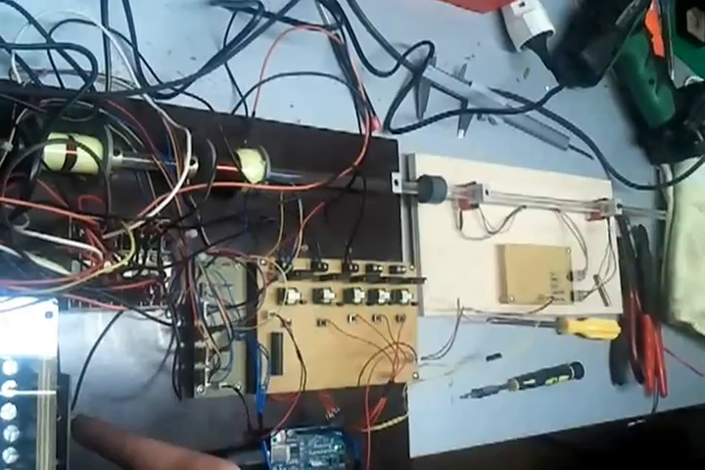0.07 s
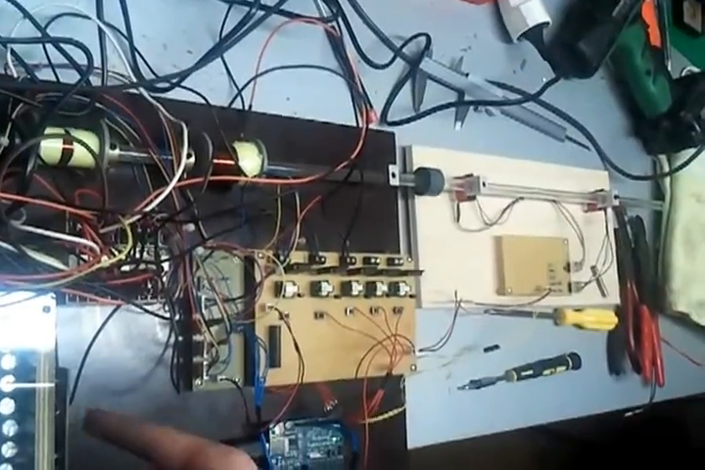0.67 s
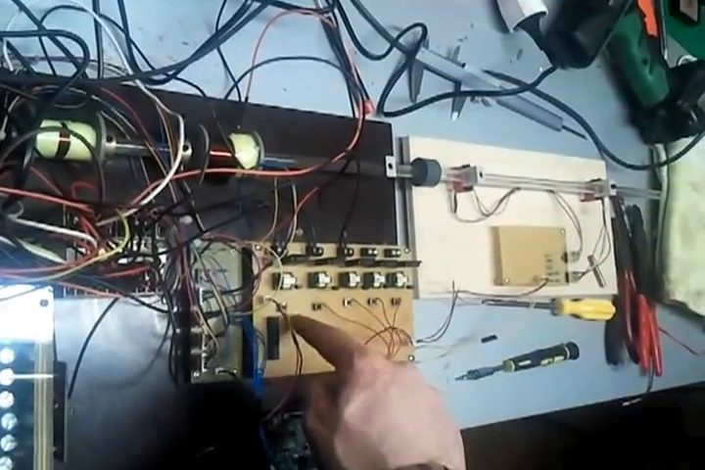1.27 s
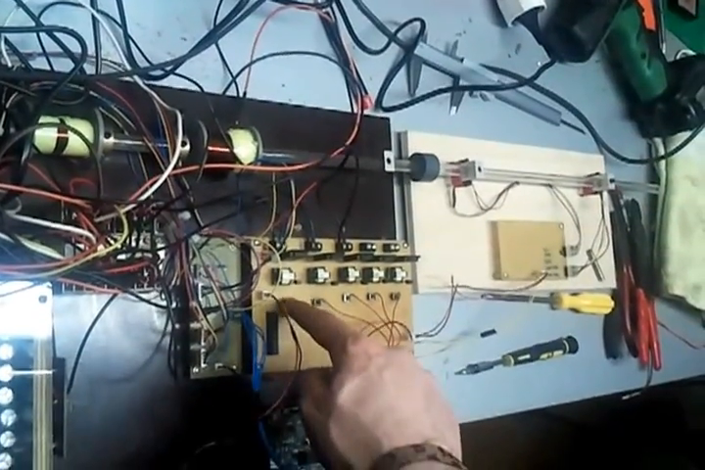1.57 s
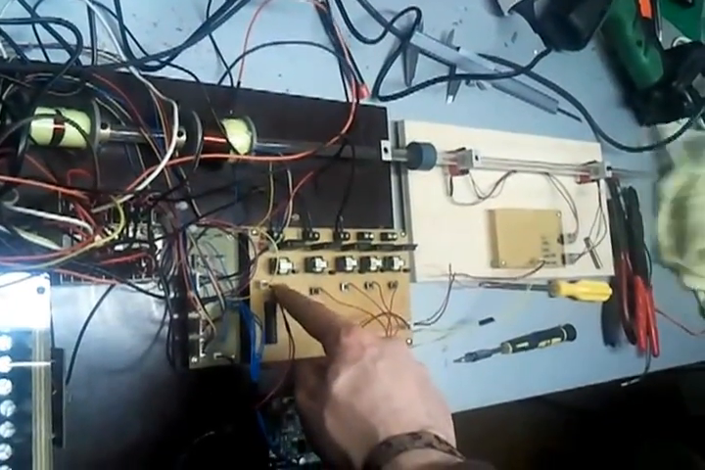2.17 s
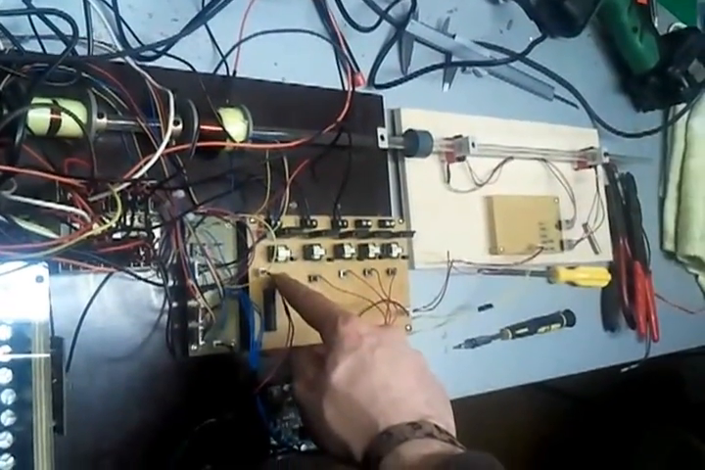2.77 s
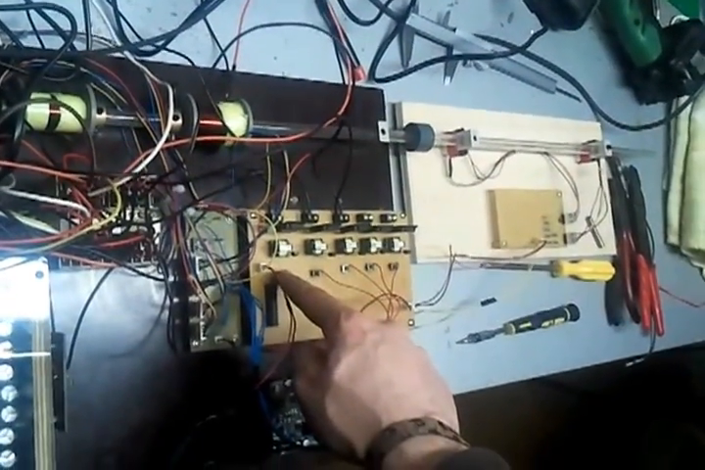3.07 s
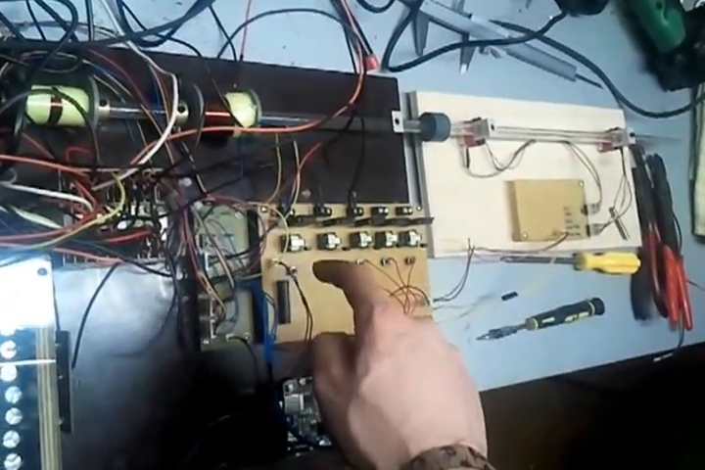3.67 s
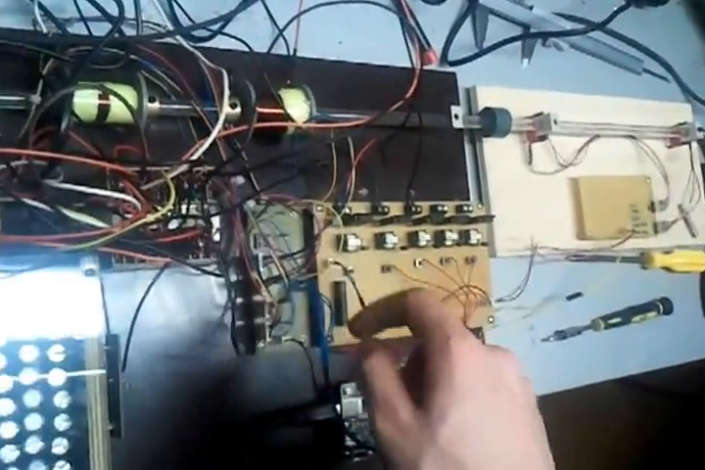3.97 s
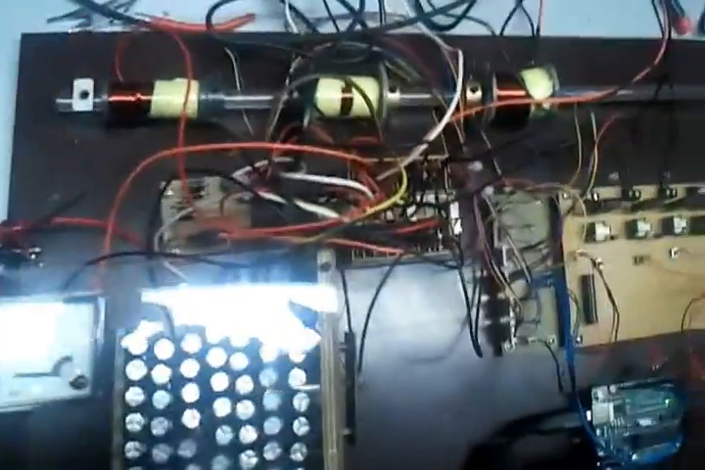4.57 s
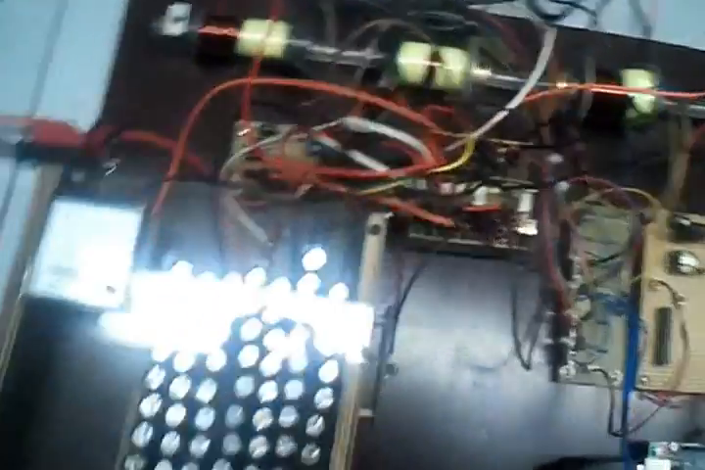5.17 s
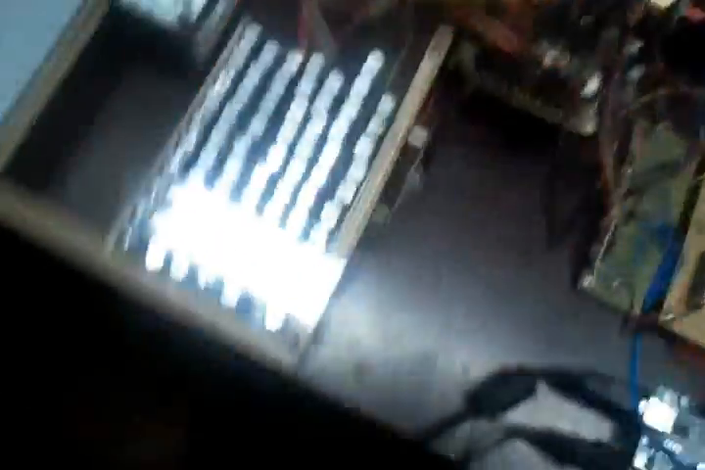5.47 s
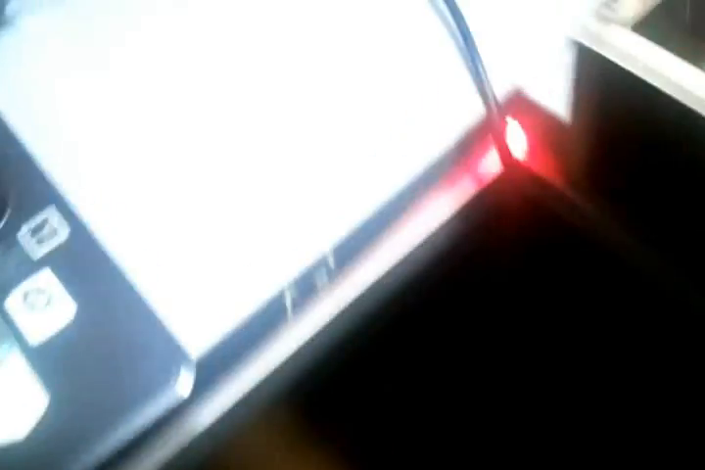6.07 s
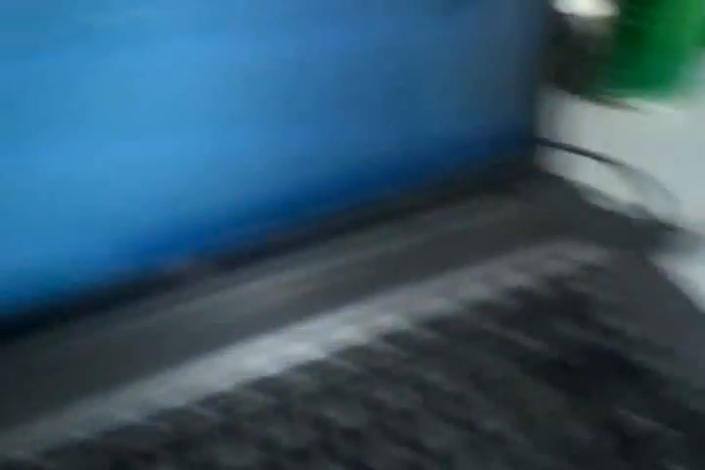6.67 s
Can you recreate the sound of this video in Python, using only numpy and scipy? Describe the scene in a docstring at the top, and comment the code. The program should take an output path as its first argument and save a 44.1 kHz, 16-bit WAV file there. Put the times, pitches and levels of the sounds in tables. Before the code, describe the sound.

After a small click, an electromagnetic gun bangs, and the metal projectile hits a wooden panel, bounces and settles, followed by soft handling rustles.

```python
"""A homemade coilgun fires on a workbench in a small, hard room, heard over a steady microphone hiss.
First a plastic switch clicks. Then the coils kick the bench and the steel slug leaves with a crack.
It booms against a wooden panel, glances off furniture, rings on the floor and bounces to rest.
Last, the small mono camera is picked up, with soft bumps, knocks, ticks and a rustle of hand and sleeve.
Each hard blow is a burst of noise plus a few ringing tones; each rustle is a soft, fluttering hiss."""
import sys
import numpy as np
from scipy import signal
from scipy.fft import rfft, irfft, next_fast_len
from scipy.io import wavfile

SR = 44100
rng = np.random.default_rng(int(sys.argv[2]) if len(sys.argv) > 2 else 0)


def digitize_waveform(pressure):
    """Quantize a signal to 16-bit integers and store it at the path in sys.argv[1].

    Rows of a 2-D input are taken as channels; values are limited to [-1, 1].
    """
    field = np.atleast_2d(pressure).T
    bounded = np.clip(field, -1, 1)
    quanta = np.round(bounded * 32767).astype(np.int16)
    wavfile.write(sys.argv[1], SR, quanta)


N = 300762
TIME_S = np.arange(N) / SR
AGE_S = np.arange(SR) / SR  # time since a blow


def undb(db):
    """Turn decibels into a number to multiply by."""
    return 10 ** (np.asarray(db) / 20)


def value_at(points, hz):
    """Read between (pitch_hz, value) points, spacing octaves evenly."""
    pitches, values = np.transpose(points)
    return np.interp(np.log(np.maximum(hz, 1)), np.log(pitches), values)


def unit(x):
    """Scale a sound to an average strength (rms) of 1."""
    return x / np.sqrt(np.mean(x ** 2))


def unit_attack(x):
    """Scale a blow to a strength of 1 over its first 30 ms."""
    return x / np.sqrt(np.mean(x[AGE_S < .03] ** 2))


def tint(x, colour):
    """Give a sound a colour: turn each pitch up or down by a list of (pitch_hz, gain_db)."""
    size = next_fast_len(len(x) // 2 + 1) * 2
    gain = undb(value_at(colour, np.fft.rfftfreq(size, 1 / SR)))
    cepstrum = np.fft.irfft(np.log(gain))
    # fold the filter so that it rings only after a blow, never before
    cepstrum[1:size // 2] *= 2
    cepstrum[size // 2 + 1:] = 0
    return irfft(rfft(x, size) * np.exp(rfft(cepstrum)), size)[:len(x)]


def wander(rate_hz):
    """A random line that drifts around zero, mostly between -1 and 1."""
    points = rng.standard_normal(int(N / SR * rate_hz) + 2)
    return np.interp(TIME_S * rate_hz, np.arange(len(points)), points)


def add(track, start_s, sound):
    """Mix a sound into the track."""
    start = int(start_s * SR)
    track[start:start + len(sound)] += sound[:N - start]


# how long the room echoes: pitch_hz, fade_s (a fade is the time to drop by 60 dB)
ROOM_FADES = [(60, 0.93), (250, 0.4), (900, 0.41), (2000, 0.42), (4000, 0.41), (7500, 0.38)]
def burst(colour, fade_s, room_db, linger=1):
    """A struck thing gives a puff of noise; the room carries it on. Linger scales the echo's length."""
    hz = np.fft.rfftfreq(len(AGE_S), 1 / SR)
    edges_hz = [0, 180, 360, 600, 1000, 1600, 2500, 4000, 6000, 10000]
    spectrum = rfft(rng.standard_normal(len(AGE_S)))
    direct = undb(-60 * AGE_S / fade_s)
    out = 0
    for low, high in zip(edges_hz, edges_hz[1:]):
        echo_s = linger * value_at(ROOM_FADES, (low + high) / 2)
        echo = undb(room_db - 60 * AGE_S / echo_s)
        band = irfft(spectrum * ((hz >= low) & (hz < high)), len(AGE_S))
        out += unit_attack(band * np.hypot(direct, echo)) * np.sqrt(high - low)
    return unit_attack(tint(out, colour))


def ring(tones, sustain):
    """An object's own tones, in a new mix at each blow. Sustain scales their fade times."""
    out = 0
    for hz, level_db, fade_s in tones:
        chance_db, direction = rng.standard_normal(2)
        swell = 1 - np.exp(-AGE_S * hz / 3)  # builds over about three cycles
        fade = undb(-60 * AGE_S / (sustain * fade_s))
        wave = np.sign(direction) * np.sin(2 * np.pi * hz * AGE_S)
        out += undb(level_db + chance_db) * swell * fade * wave
    return unit_attack(out)


def blows(hits, colour, tones, fade_s, room_db, linger, ring_db, ripple_db, sustain=1):
    """Hard blows on one object: each is a burst of noise plus ringing tones."""
    # every object has its own fine pattern of stronger and weaker pitches
    hz = np.arange(500, 9000, 55)
    ripple = np.column_stack([hz, ripple_db * rng.standard_normal(len(hz)) * (hz > hz[0])])
    out = np.zeros(N)
    for start_s, level_db in hits:
        noise = unit_attack(tint(burst(colour, fade_s, room_db, linger), ripple))
        ringing = undb(ring_db) * ring(tones, sustain)
        add(out, start_s, undb(level_db) * unit_attack(noise + ringing))
    return out


def tap(pitch_hz, width_octaves, fade_s, room_db):
    """A light touch makes a burst of noise around one pitch."""
    hz = np.geomspace(20, 10000, 60)
    hump_db = -48 * np.log10(1 + (np.log2(hz / pitch_hz) / (2 * width_octaves)) ** 2)
    treble_loss_db = 44 * np.maximum(np.log2(hz / 6240), 0)  # the microphone dulls the highs
    return burst(np.column_stack([hz, hump_db - treble_loss_db]), fade_s, room_db)


def rustle(speed, colour, jitter_db, flutter_db):
    """A soft, fluttering hiss of rubbing, louder when the rubbing is faster."""
    noise = rng.standard_normal(N) * undb(jitter_db * rng.exponential(size=N))
    return unit(tint(noise, colour)) * speed * undb(flutter_db * wander(60))


# colour of the hiss: pitch_hz, gain_db
HISS_COLOUR = [(25, -23), (54, -15), (170, -2.5), (243, 0), (400, -2), (826, -4), (1400, -8), (2500, -10.5),
               (4200, -11), (6100, -12.5), (7000, -19.5), (7600, -29.5), (9000, -45)]
# faint whines in the hiss: pitch_hz, width_hz, level_db
HISS_WHINES = [(1880, 55, -70.5), (4980, 23, -70), (5310, 60, -75), (6094, 50, -75), (6174, 57, -79.5)]
def background():
    """Even microphone hiss over a faint rush of the room, with a thin whine in it."""
    out = unit(tint(rng.standard_normal(N), HISS_COLOUR)) * undb(-54.5 + 0.35 * wander(5))
    for hz, width_hz, level_db in HISS_WHINES:
        narrow_band = signal.iirpeak(hz, hz / width_hz, fs=SR)
        out += undb(level_db) * unit(signal.lfilter(*narrow_band, rng.standard_normal(N)))
    return out


# soft bumps on the camera: start_s, level_db
FINGER_BUMPS = [(4.835, -51.5), (5.005, -55), (5.046, -57)]
def bumps():
    """Fingers thud on the camera, always at the same low pitch."""
    out = np.zeros(N)
    for start_s, level_db in FINGER_BUMPS:
        thud = tap(pitch_hz=85, width_octaves=0.72, fade_s=0.081, room_db=-25)
        add(out, start_s, undb(level_db) * thud)
    return out


# slides of the hand: start_s, length_s, level_db
HAND_SLIDES = [(5.197, .1, -58), (5.46, 0.43, -51.5), (5.898, 0.27, -54.5), (6.516, 0.062, -49),
               (6.663, 0.091, -53)]
# colour of the rubbing: pitch_hz, gain_db
HAND_COLOUR = [(60, -23.5), (250, -4), (900, -3), (1400, 3.5), (2050, 2.5), (2900, 0.5), (3500, -5),
               (4300, -6), (4780, 1.5), (5700, -5), (6400, -8), (7200, -14.5), (8000, -32)]
def hand(rise_share=0.7, release_s=0.16):
    """A hand slides along the camera and its cable: it gathers speed, holds it and lets go."""
    speed = 0
    for start_s, length_s, level_db in HAND_SLIDES:
        rise = np.clip((TIME_S - start_s) / (rise_share * length_s), 0, 1)
        release = np.exp(-np.maximum(TIME_S - start_s - length_s, 0) / release_s)
        speed += undb(level_db) * rise * release
    return rustle(speed, HAND_COLOUR, jitter_db=0, flutter_db=1.5)


# a sleeve swishing past: peak_s, level_db
SLEEVE_SWISHES = [(6.438, -38), (6.82, -48.5)]
# colour of the cloth: pitch_hz, gain_db
SLEEVE_COLOUR = [(60, -9.5), (280, 2), (700, -3.5), (1700, 0.5), (2600, -4.5), (4300, -7), (5600, 0.5),
                 (6400, -0.5), (7200, -12), (8000, -18.5)]
def sleeve(rise_db_per_s=46.5, fall_db_per_s=202):
    """A swish swells slowly as the cloth comes near, then stops quickly."""
    speed = 0
    for peak_s, level_db in SLEEVE_SWISHES:
        drop_db = np.maximum(rise_db_per_s * (peak_s - TIME_S), fall_db_per_s * (TIME_S - peak_s))
        speed += undb(level_db - drop_db)
    return rustle(speed, SLEEVE_COLOUR, jitter_db=0.7, flutter_db=1.2)


# small sharp ticks: start_s, level_db, pitch_hz, fade_s
SMALL_TICKS = [(.849, -57.5, 5760, 0.092), (1.695, -58, 1400, .04), (2.323, -40, 2500, 0.026),
               (2.576, -39.5, 2450, 0.045), (5.175, -58, 4160, .03), (5.457, -49, 1950, .08),
               (6.377, -41, 1790, 0.085), (6.4221, -39.5, 4750, 0.0022), (6.459, -49, 1320, 0.22)]
def ticks(usual_fade_s=0.08):
    """Metal and plastic tick. The longer a tick rings, the purer it is and the more it echoes."""
    out = np.zeros(N)
    for start_s, level_db, hz, fade_s in SMALL_TICKS:
        stretch = fade_s / usual_fade_s
        width_octaves = 0.36 / stretch ** 0.51
        room_db = -11 + 10 * np.log10(stretch)
        add(out, start_s, undb(level_db) * tap(hz, width_octaves, fade_s, room_db))
    return out


# the slug settling and things nudged on the bench: start_s, level_db, pitch_hz, room_db
WOOD_KNOCKS = [(2.577, -43.5, 480, -20), (3.5617, -39.5, 295, -7.5), (3.6812, -47.5, 290, -5),
               (5.542, -39, 307, -10), (5.668, -43, 306, -10.5), (6.344, -41.5, 264, -8),
               (6.372, -39.5, 250, -16), (6.702, -49.5, 400, -18)]
def knocks(body_delay_s=0.005):
    """Each knock is a bright touch, then the deeper body of the wood answers."""
    out = np.zeros(N)
    for start_s, level_db, hz, room_db in WOOD_KNOCKS:
        touch = tap(hz * 1.88, width_octaves=0.91, fade_s=0.073, room_db=room_db)
        body = tap(hz, width_octaves=0.53, fade_s=0.09, room_db=room_db)
        add(out, start_s, undb(level_db - 3) * touch)
        add(out, start_s + body_delay_s, undb(level_db) * body)
    return out


# the switch pressed and snapping home: start_s, level_db
CLICKS = [(.7735, -37), (.7795, -44.5)]
# colour of a click: pitch_hz, gain_db
CLICK_COLOUR = [(60, -38), (250, -19), (550, -3.5), (1000, 1.5), (1400, -6), (2000, -15.5), (3300, -20),
                (4900, -15), (6500, -26), (8000, -44)]
# tones of the switch's case: pitch_hz, level_db, fade_s
CASE_TONES = [(811, -8, .15), (940, 10, 0.15), (1023, -2, .2), (1187, -7, .25), (1360, -5, 0.41)]
def switch():
    """A plastic switch clicks twice, very fast, and its case rings."""
    return blows(CLICKS, CLICK_COLOUR, CASE_TONES,
                 fade_s=0.01, room_db=-21.5, linger=0.71, ring_db=-11, ripple_db=0.5)


# the slug bouncing on the floor: start_s, level_db
BOUNCES = [(3.1935, -18), (3.221, -17.5)]
# colour of a bounce: pitch_hz, gain_db
BOUNCE_COLOUR = [(60, -53), (150, -35), (245, -9), (390, -16.5), (485, -13.5), (620, -18), (850, -8.5),
                 (1100, -10), (1450, -3), (2300, -5.5), (2800, -6.5), (3850, -0.5), (4700, -4.5),
                 (6200, -4), (7600, -19), (9000, -25)]
# tones of the steel slug: pitch_hz, level_db, fade_s
SLUG_TONES = [(482, -12.5, 1), (827, -10, 1), (938, -10, 1), (1458, -3.5, .5), (1797, -4.5, 0.88),
              (2150, -12.5, .45), (2360, -0.5, 1), (2420, 0.5, 0.78), (3007, 0, 0.25), (3800, -8, 0.24),
              (3794, -12, 0.42), (3670, 1.5, 0.42), (4720, -0.5, .35), (5160, -8, 0.31), (5460, 2, 0.24),
              (5800, 7, 0.12), (6070, -15, .3), (6439, 10, 0.14)]
def slug_bounces():
    """The steel slug clinks off the hard floor and fills the room with echo."""
    return blows(BOUNCES, BOUNCE_COLOUR, SLUG_TONES,
                 fade_s=0.08, room_db=9.5, linger=0.83, ring_db=-5, ripple_db=1.5, sustain=0.85)


# the slug landing flat: start_s, level_db
LANDINGS = [(3.3845, -14), (3.415, -23.5)]
# colour of a landing: pitch_hz, gain_db
LANDING_COLOUR = [(59, -58), (100, -41), (235, -7.5), (356, -16.5), (460, -0.5), (532, 0), (593, -1),
                  (968, -1.5), (1250, 1.5), (1610, -5.5), (2150, 1), (3390, -4), (4870, -8), (7000, -26.5),
                  (7670, -45.5), (9970, -77), (16900, -120)]
# tones of the slug against the floor: pitch_hz, level_db, fade_s
FLOOR_TONES = [(470.6, 10.5, 0.19), (735, 1, 0.2), (1060, -14, 0.26), (1273, 2, 0.17), (2190, -5, 0.41),
               (2182, -6, 0.49), (2490, 1, 0.3), (3000, -18, .3), (3340, 9.5, .2), (3200, 6.5, 0.27),
               (4467, 0, 0.26), (4940, -4, .25)]
def slug_lands():
    """The slug clacks down flat; staying against the floor cuts its ringing short."""
    return blows(LANDINGS, LANDING_COLOUR, FLOOR_TONES,
                 fade_s=0.14, room_db=-3, linger=0.92, ring_db=-6.5, ripple_db=0.5, sustain=0.69)


# the slug hitting the panel, then the furniture: start_s, level_db
PANEL_HITS = [(2.7585, -9), (2.889, -25), (2.928, -45)]
FURNITURE_HITS = [(3.053, -30), (3.071, -29)]
# colour of each kind of hit: pitch_hz, gain_db
PANEL_COLOUR = [(40, -68), (100, -29), (190, -12.5), (270, -1), (370, 1.5), (560, -5), (700, -0.5),
                (900, 0), (1100, -0.5), (1350, -8.5), (2300, -15.5), (3200, -25.5), (6000, -29.5),
                (7600, -46.5)]
FURNITURE_COLOUR = [(80, -34), (220, -12.5), (350, -10.5), (620, 5), (800, -11.5), (1030, 11), (1200, -15),
                    (1450, 0.5), (2500, -10), (3800, -18.5), (5000, -27.5), (7000, -53)]
# tones of the wood: pitch_hz, level_db, fade_s
WOOD_TONES = [(64.5, -18.5, 0.64), (144, -16.5, 0.71), (233, -17, 0.94), (354, -2, 0.13), (397, -1.5, 0.77),
              (449, -0.5, 0.64), (518, -3, 0.52), (684, -10, 0.74), (760, -19.5, 0.7), (807, -5.5, 0.82),
              (943, -1, 0.76), (970, -6, 0.28), (1059, 2.5, .36), (1060, 8, 0.23), (1850, -9, .3),
              (2210, -18, 0.63)]
def slug_hits_wood():
    """The slug booms on a panel and glances off furniture, far across the room, so the echo is strong."""
    boom = blows(PANEL_HITS, PANEL_COLOUR, WOOD_TONES,
                 fade_s=0.059, room_db=1, linger=1.13, ring_db=-6.5, ripple_db=3)
    glance = blows(FURNITURE_HITS, FURNITURE_COLOUR, WOOD_TONES,
                   fade_s=0.22, room_db=2, linger=0.84, ring_db=-23.5, ripple_db=4.5)
    return boom + glance


# coils jolting the gun, and steel striking steel as the slug leaves: start_s, level_db
COIL_KICKS = [(2.3312, -16.5), (2.3372, -13.5), (2.342, -15), (2.3765, -17.5)]
STEEL_CRACKS = [(2.3298, -24.5), (2.3372, -22.5), (2.3528, -6.5), (2.358, -17)]
# colour of a kick and of a crack: pitch_hz, gain_db
COIL_COLOUR = [(40, -52), (120, -22.5), (220, -17), (330, 0.5), (430, 0), (560, -9.5), (780, -7.5),
               (1000, -14), (1500, -14), (2200, -9.5), (3500, -22), (6500, -24.5), (8000, -45.5)]
STEEL_COLOUR = [(60, -29.5), (300, -4), (700, -12), (1500, -3.5), (2200, -13), (2800, -3), (4400, 2),
                (5300, -5), (6500, -7), (8000, -22)]
# tones of the bench and of the barrel: pitch_hz, level_db, fade_s
BENCH_TONES = [(380, 0.5, .2), (454, -8.5, 0.18), (183.5, -16.5, 0.27), (262, -11, 0.23)]
BARREL_TONES = [(2446, 3, 0.26), (2720, -0.5, 0.23), (3450, 0.5, 0.2), (3505, -1.5, 0.17),
                (3670, -1.5, 0.16), (3980, -4, 0.29), (4260, -15, 0.2014), (4360, 4.5, 0.22),
                (4220, -1.5, .2), (4760, 0, .22), (4800, -3.5, 0.31), (5310, -4.5, .24), (5800, -1.5, .25),
                (5826, -9.5, .22)]
def gun():
    """The coils thump the bench one after another as the slug cracks out of the barrel."""
    thump = blows(COIL_KICKS, COIL_COLOUR, BENCH_TONES,
                  fade_s=0.039, room_db=-20.5, linger=0.75, ring_db=-11, ripple_db=2)
    crack = blows(STEEL_CRACKS, STEEL_COLOUR, BARREL_TONES,
                  fade_s=0.09, room_db=-8, linger=0.86, ring_db=-9, ripple_db=0)
    return thump + crack


def scene():
    """Everything reaches one microphone, so left and right are the same."""
    shot = gun() + slug_hits_wood() + slug_bounces() + slug_lands()
    mono = shot + switch() + knocks() + ticks() + bumps() + hand() + sleeve() + background()
    return np.array([mono, mono])


def record(dry, lowest_hz=45, highest_hz=7600):
    """The camera overloads on the loudest blows and loses the deep bass and the high treble."""
    clipped = np.clip(dry, -.8, .8)
    bass_cut = signal.butter(2, lowest_hz, "highpass", fs=SR, output="sos")
    treble_cut = signal.cheby1(12, .1, highest_hz, fs=SR, output="sos")
    return signal.sosfilt(treble_cut, signal.sosfilt(bass_cut, clipped))


dry = scene()
out = record(dry)
digitize_waveform(out)
```